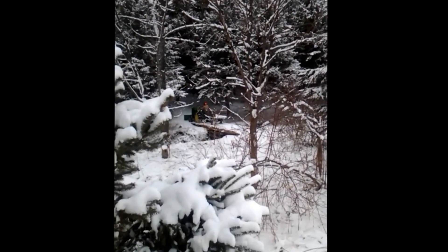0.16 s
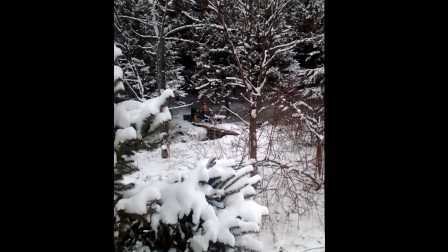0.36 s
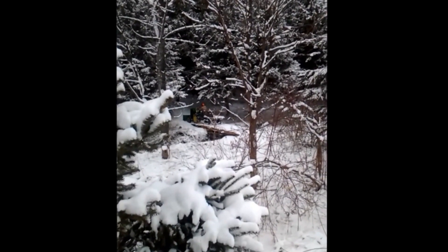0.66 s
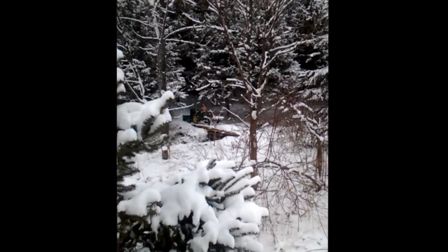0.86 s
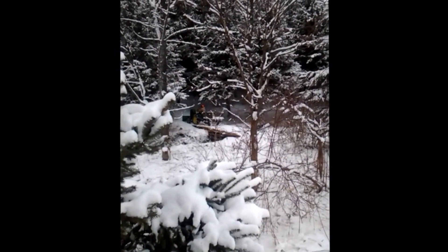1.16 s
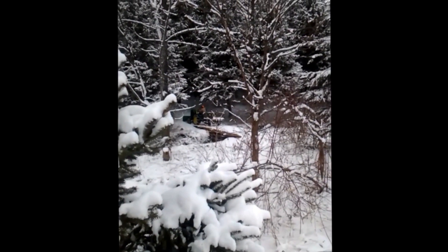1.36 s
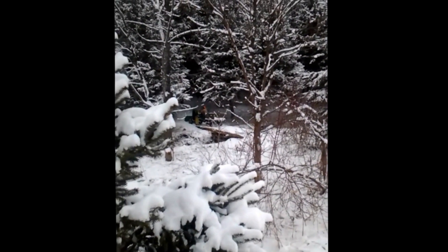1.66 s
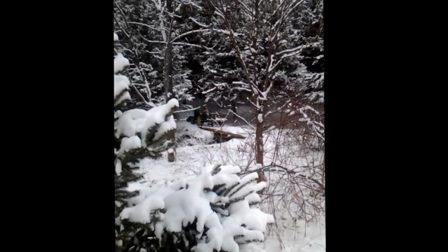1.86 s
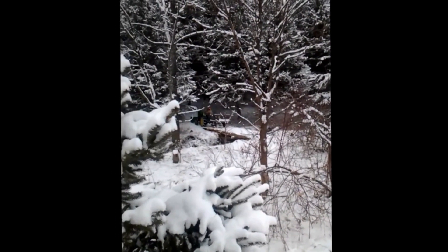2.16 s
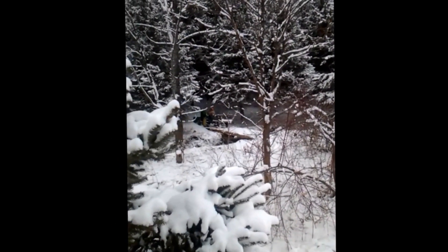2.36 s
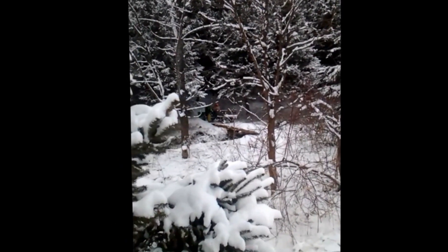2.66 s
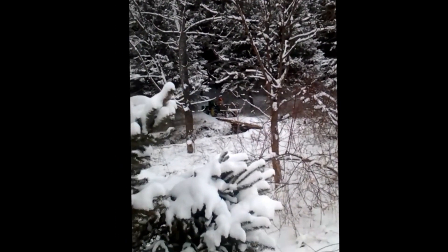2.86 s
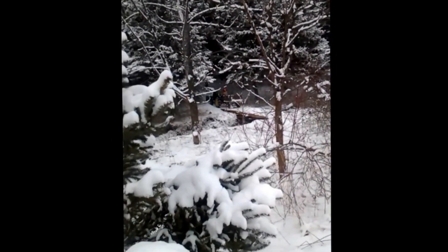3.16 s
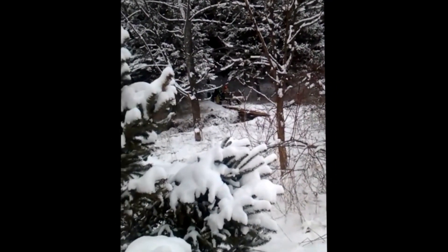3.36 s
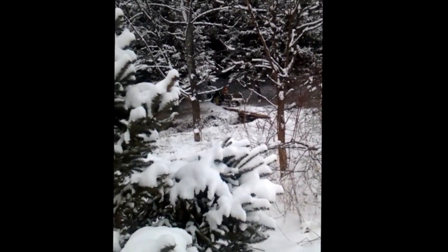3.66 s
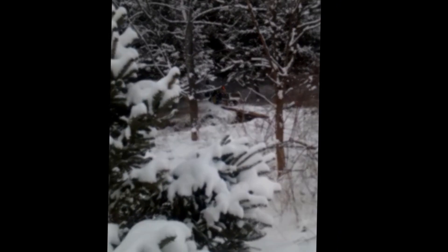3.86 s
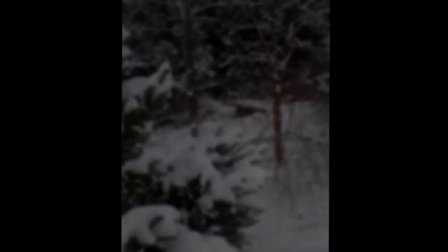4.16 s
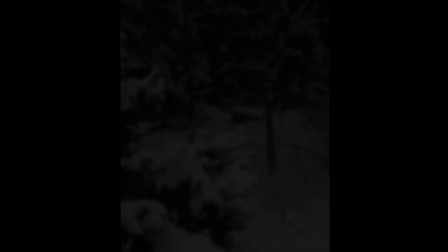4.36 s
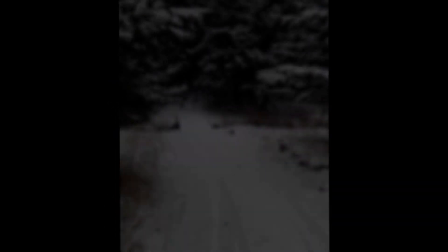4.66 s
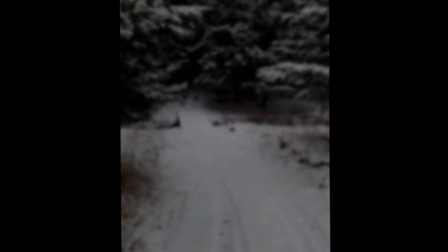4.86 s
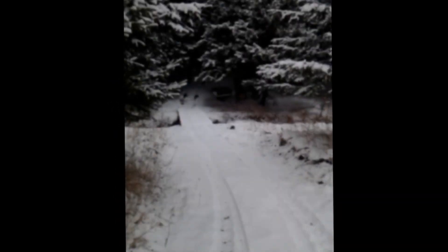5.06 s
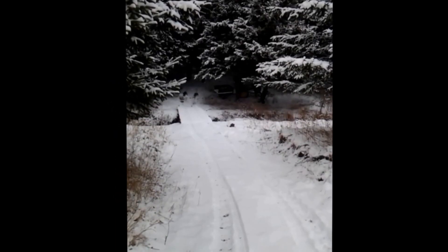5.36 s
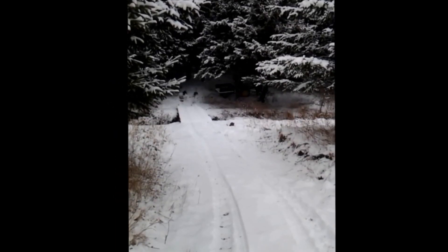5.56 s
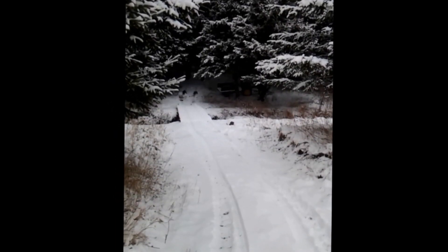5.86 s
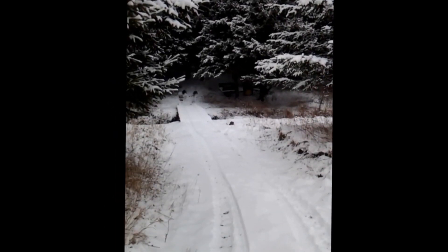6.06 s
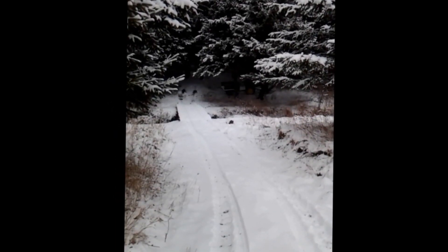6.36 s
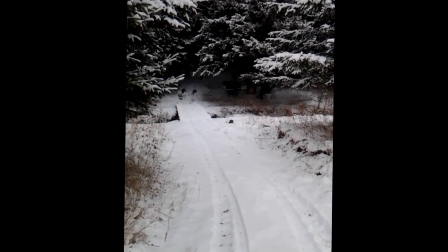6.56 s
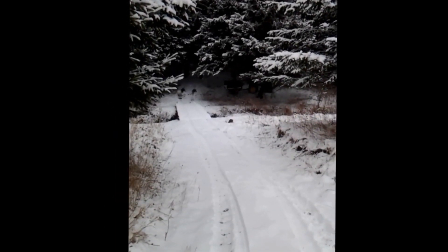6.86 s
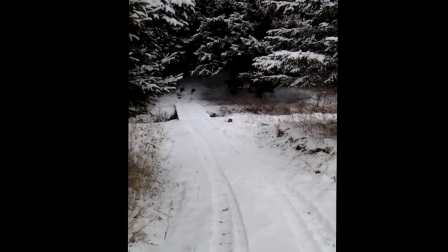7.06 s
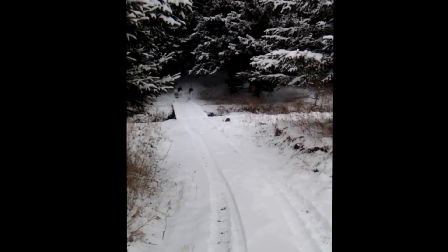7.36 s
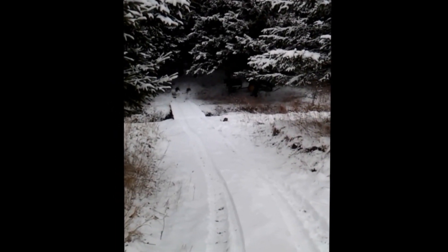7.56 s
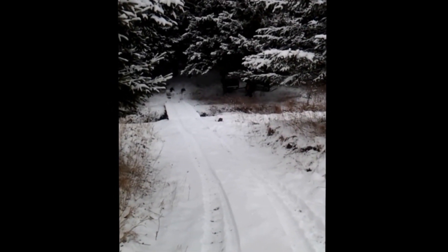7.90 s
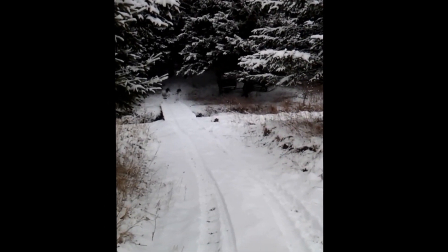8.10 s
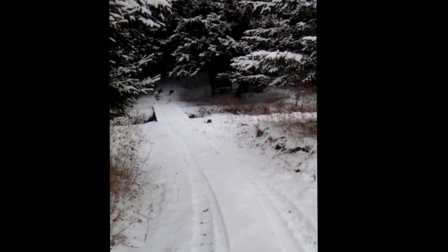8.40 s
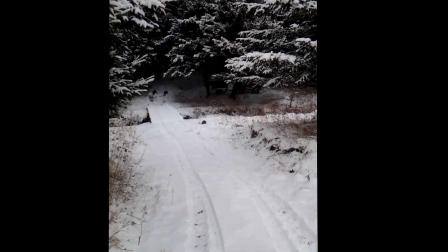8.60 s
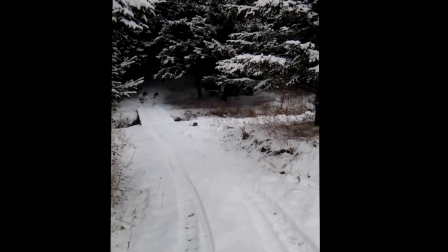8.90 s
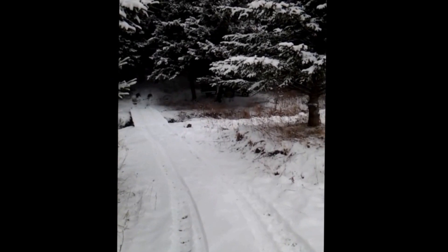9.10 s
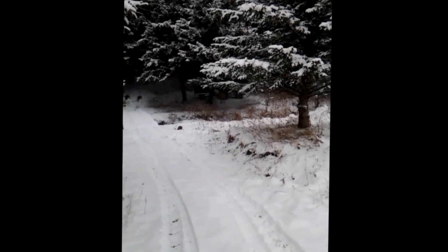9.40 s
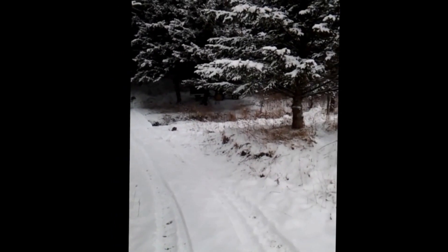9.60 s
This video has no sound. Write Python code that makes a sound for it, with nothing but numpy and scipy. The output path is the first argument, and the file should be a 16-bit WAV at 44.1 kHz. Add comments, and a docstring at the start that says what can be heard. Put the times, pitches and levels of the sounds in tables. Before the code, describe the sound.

An old two-cylinder diesel tractor idles at a distance in snowy woods, knocks hard as it throttles up, then runs on faster while fingers bump the microphone.

```python
"""An old two-cylinder diesel tractor idles some way off in a snowy wood; hard knocks mark the throttling up.
It pulls for a while, then runs on faster. Fingers rub and bump the right port of the hand-held microphone.
Two exhaust puffs per cycle ring pipe and silencer, and noise echoes from the trees; injector and valve
blows are shaped noise that follows effort and throttle; knocks and bumps also ring decaying sines.
"""
import sys
import numpy as np
from scipy import signal
from scipy.fft import rfft, irfft
from scipy.io import wavfile
from scipy.ndimage import uniform_filter1d, map_coordinates

SR = 44100
rng = np.random.default_rng(int(sys.argv[2]) if len(sys.argv) > 2 else 0)


def write(x):
    x = np.atleast_2d(x).T
    wavfile.write(sys.argv[1], SR, np.round(np.clip(x, -1, 1) * 32767).astype(np.int16))


N = 429534
TIME = np.arange(N) / SR

# Levels are relative within each part unless noted; spectra are normalised to unit power.

# crankshaft [t/s, four-stroke cycles completed]
CRANK = [(-0.042, 0), (0.344, 3), (0.714, 6), (1.103, 9), (1.642, 13), (2.292, 18), (2.558, 20), (2.67, 21),
         (2.87, 23), (3.483, 30), (4.477, 41), (5.319, 50), (5.591, 53), (7.058, 69), (7.798, 77),
         (8.532, 85), (9.087, 91), (9.822, 99)]
# throttle (0-1) from cycle rate; the flywheel follows later
IDLE_THROTTLE, IDLE_CYCLES_PER_S, THROTTLE_PER_CYCLE_RATE, FLYWHEEL_LAG_S = 0.3, 8.08, 0.26, 0.31
# engine effort, heard as mechanical noise; eases abruptly as the pull ends [t/s, level/dB]
EFFORT = [(0.0, -43), (0.44, -43.5), (0.96, -45), (1.89, -43.5), (2.05, -45), (2.52, -37.5), (2.7, -33),
          (2.87, -31), (3.37, -34.5), (3.76, -31.5), (5.14, -31.5), (5.29, -31.5), (5.39, -35),
          (6.19, -36.5), (6.64, -39), (7.5, -36), (8.47, -37.5), (9.74, -36)]
# exhaust roar, by how hard the engine pulls [t/s, level/dB]
LOAD = [(0.0, -50), (0.75, -48.5), (1.28, -48.5), (2.47, -48.5), (2.77, -39), (2.89, -34), (3.23, -40.5),
        (3.51, -41.5), (3.84, -36.5), (3.88, -34), (4.54, -31), (5.29, -32.5), (5.39, -33), (6.47, -35),
        (8.72, -35), (8.99, -34), (9.74, -33.5)]
# a blip of fuel swells the roar just before the run-up
BLIP_S, BLIP_WIDTH_S, BLIP_DB = 2.16, 0.065, 7.5
# part laws [level/dB at mean effort and full throttle, slope/dB per dB effort, level/dB added at shut throttle]
THUD_LAW = (-51, 0.017, -14.5)
RATTLE_LAW = (-40.5, 1, -2.1)
BRIGHT_LAW = (-43.5, 1.52, 9)
PING_LAW = (-52, 2.46, 2)
RUSH_LAW = (-44, 1.26, 8.6)

# microphone aim as the hand turns it [t/s, roar L-R/dB, bright clatter L-R/dB]
AIM = [(0, 0, -4.5), (3.3, 2, -5.5), (4.2, -0.5, -8), (5.28, -0.5, -5), (5.45, -2.2, -11.5),
       (9.74, -1, -12)]
# left port hears the engine later [t/s, lag/samples]
PORT_LAG = [(0, 6.3), (2.4, 6.02), (4.6, 8.04), (9.74, 8)]
# port resonances [f/Hz, width/Hz, lift/dB]
LEFT_PORT = [(2326, 310, 14.5), (6400, 800, 0.5), (7600, 390, 4), (8200, 1600, 5)]
RIGHT_PORT = [(10100, 1700, -2)]
# right port ring, lower once the grip has shifted
RIGHT_RING_HZ, RIGHT_RING_LATE_HZ, RIGHT_RING_WIDTH_HZ, RIGHT_RING_DB = 6990, 6760, 286, 7.5
GRIP_SHIFT_S, GRIP_SHIFT_LENGTH_S = 5.3, .15
CUTOFF_HZ = 14900

# rush of air and gears [f/Hz, level/dB per Hz]
FAN_SPECTRUM = [(20, -20), (60, -5), (150, 7), (235, 3), (310, 8), (400, 6.5), (1000, 2.5), (2500, -6.5),
                (4000, -2), (6000, -7), (9000, -6), (11000, -11), (14500, -28)]
FAN_WAVER_DB, FAN_WAVER_HZ, FAN_WAVER_TOP_HZ = 3, 5, 400  # depth before normalising, rate, upper edge
FAN_LOW_DB_PER_DB = -.55

# finger bumps, and low thumps that come with the knocks at 2.552 and 2.668 s; a firmer touch rings higher [t/s,
# peak level/dB, case ring f/Hz]
BUMPS = [(0.149, -27.5, 278), (0.176, -31, 280), (0.236, -29, 260), (0.286, -26.5, 210), (0.315, -38, 290),
         (0.412, -28.5, 166), (0.424, -40, 219), (0.433, -25, 260), (0.881, -42, 260), (1.87, -38, 149),
         (2.209, -40, 120), (2.365, -36, 135), (2.498, -26.5, 260), (2.552, -30, 189), (2.668, -33, 200),
         (2.76, -21, 300), (2.947, -26, 300), (3.468, -7, 380), (3.483, -8.5, 328), (3.504, -8.5, 280),
         (3.511, -9.5, 240), (3.551, -12, 240), (3.586, -12, 302), (3.594, -5, 316), (3.629, -12, 290),
         (3.64, -10.5, 345), (3.679, -14, 300), (3.685, -7, 384), (3.737, -7.5, 403), (3.782, -14, 418),
         (3.811, -18, 220), (3.829, -16, 220), (3.968, -23, 260), (4.033, -14.5, 260), (4.293, -14, 300),
         (4.338, -10, 280), (4.376, -7, 320), (4.774, -14.5, 359.5), (4.872, -14, 275), (5.173, -16, 300.3),
         (5.212, -9.5, 387), (5.292, -12.5, 364.7), (5.526, -21.5, 217), (5.543, -18, 298.5),
         (5.660, -15.5, 271), (5.686, -16, 223.5), (5.811, -25, 259.8), (6.064, -22, 260)]
# sliding fingers [start/s, end/s, level/dB]
RUBS = [(0.07, 0.298, -50), (.4, 0.44, -53), (0.947, 1.348, -63.5), (2.477, 3.4, -49), (3.444, 3.784, -32),
        (3.964, 4.064, -31), (4.117, 4.203, -37), (4.264, 4.44, -32), (4.584, 4.673, -42),
        (4.757, 4.78, -40), (4.828, 5.015, -32.5), (5.082, 5.193, -35), (5.202, 5.295, -33),
        (5.508, 6.11, -47.5)]
# skin on the case [f/Hz, level/dB per Hz]
FINGER_SPECTRUM = [(40, -54), (90, -10.5), (170, 0), (330, -3), (480, -5), (700, -12), (1200, -27.5),
                   (3000, -37)]
RUB_ATTACK_S, RUB_RELEASE_DB_PER_S = 0.0092, 106
CATCHES_PER_S, CATCH_DB, CATCH_SPREAD_DB = 22, 1.5, 2.5  # mean rate; level re rub
CASE_HZ, CASE_T60_S, CASE_DB = 348, 0.013, -13.5
BUMP_RISE_S = .002  # soft skin presses gradually
# a light touch booms; a firm one damps the bass and scrapes higher up
TOUCH_BASS_HZ, TOUCH_BASS_DB, FIRM_RUB_DB = 197, 11.5, -40
SCRAPE_HZ, SCRAPE_DB = 433, -5.5

# knocks, light at idle, hardest at the throttling up [t/s, crack level/dB, clank level/dB, clank centre f/Hz]
KNOCKS = [(0.084, -22, -48, 1900), (0.212, -23.5, -35, 2100), (0.34, -21.5, -34, 1750),
          (0.466, -22.5, -42, 2000), (0.588, -30, -36, 2200), (0.711, -27, -41, 1900),
          (0.747, -29, -33, 1850), (0.969, -29, -43, 2000), (1.235, -27, -43, 1800),
          (1.371, -20.5, -42, 1800), (1.404, -28, -40, 2100), (1.504, -21.5, -36.5, 1750),
          (1.638, -25, -34.5, 1800), (1.769, -25.5, -34, 1900), (1.802, -25, -39, 2200),
          (1.902, -20, -31, 1700), (1.932, -24, -42, 1900), (2.030, -21, -33, 2000),
          (2.061, -28, -42, 2200), (2.1094, -24, -30, 2110), (2.159, -19.5, -32, 2100),
          (2.190, -30, -31.5, 2200), (2.4578, -18.5, -21.5, 1980), (2.554, -15, -18, 1750),
          (2.583, -19, -21, 1700), (2.668, -18, -17.5, 1540), (2.6955, -17.5, -14.5, 1900),
          (2.770, -16.5, -16, 1850), (2.7958, -11.5, -17, 2050), (2.8669, -9, -12, 1770),
          (2.889, -7.5, -14.5, 1880), (2.952, -12.5, -19, 1650), (3.064, -15, -25, 2100),
          (3.151, -18, -46, 2000), (3.216, -19, -44, 2000), (3.572, -20, -27.5, 1700),
          (3.595, -20, -28, 1900), (3.615, -17.5, -39, 2000), (3.661, -15, -32, 1900),
          (4.112, -17.5, -37, 2000), (4.385, -18, -40, 2000), (4.48, -21, -23, 1900),
          (4.57, -17, -32, 2000), (4.662, -16.5, -36, 2000)]
# block modes rung by a knock [f/Hz, level/dB, t60/s]
CLANK_MODES = [(1380, 9, 0.03), (1555, -1, 0.046), (1675, 10, 0.029), (1760, 1, 0.041), (1870, -0.5, 0.023),
               (2060, -2, 0.038), (2243, -2, 0.051), (2430, -1, 0.04)]
# frame shaken by a knock [f/Hz, level/dB per Hz]
FRAME_SPECTRUM = [(200, -13), (330, -1), (480, 3.5), (680, -2.5), (900, -9.5), (1250, -7.5), (1500, -22)]
KNOCK_LEAD_S, FRAME_DB = .002, -12
CLANK_DB, CLANK_SPREAD_DB, CLANK_DELAY_S, CLANK_OCTAVES = -10.5, 2.5, .005, .2
# tink of each crack; level re crack
CRACK_RING_HZ, CRACK_RING_SPREAD_HZ, CRACK_RING_T60_S, CRACK_RING_DB = 7200, 280, .028, -10.5

# metallic ticks and knock edges [f/Hz, level/dB per Hz]
PING_SPECTRUM = [(1500, -12), (4000, -36), (7500, 17), (10000, 11.5), (12500, 2.5), (15000, -14)]
# injector and valve blows [place in cycle/0-1, level/dB at shut throttle, level/dB at full throttle]
BLOWS = [(0.93, 7, 8), (0.2, 12.5, 6.5), (0.48, 11.5, 6.5), (0.14, 2, 4), (0.77, -6, 3.5)]
# casing rattle and clank [f/Hz, level/dB per Hz]
CASING_SPECTRUM = [(300, 1.5), (600, 2), (900, -11.5), (1150, -8.5), (1420, -1), (1600, 6), (1780, -1.5),
                   (1950, 2.5), (2400, -9), (2800, -5.5), (4000, -7.5), (6000, -21)]
# bright clatter and knock cracks [f/Hz, level/dB per Hz]
CLATTER_SPECTRUM = [(2000, 0), (3200, -12.5), (4000, -8.5), (4700, -7.5), (6000, 2.5), (7200, 5.5),
                    (8500, -4), (10000, -4), (12000, -58), (14500, -47)]
# engine block and sheet metal resonances [f/Hz, width/Hz, lift/dB]
BLOCK = [(1050, 120, 2), (1475, 68, -3), (1870, 33, 5), (2234, 14, 8), (3010, 110, 3.5), (3740, 150, 4.5),
         (4080, 180, 1), (4900, 110, 4), (7540, 180, 2.5)]
RATTLE_LEAN_DB = -3.5

# exhaust firings [place in cycle/0-1, level/dB]
FIRINGS = [(.92, 6), (.16, 2.5)]
# exhaust pipe modes [f/Hz, level/dB, t60/s]
PIPE_MODES = [(97.8, 9.5, 0.14), (124, 3, 0.085)]
# silencer shell modes [f/Hz, level/dB, t60/s]
SHELL_MODES = [(300, -15, 0.14), (421, 5.5, 0.36), (458.7, -1, 0.34), (531, 1, 0.38), (572, -5.5, 0.23),
               (631, -4.5, 0.28), (674, -17, 0.082), (785, -14, 0.15), (825, -22, 0.08), (1069, -9, 0.067)]
# exhaust echo and gas noise [f/Hz, level/dB per Hz]
ROAR_SPECTRUM = [(130, -12), (200, -27), (280, -16), (360, -13.5), (420, -10), (480, -3), (540, -4.5),
                 (620, -3.5), (720, -6), (850, -9.5), (960, -14), (1150, -12.5), (1400, -28.5), (2200, -20)]
# hoarse band, mostly climbing as the engine pulls [t/s, centre f/Hz]
RASP = [(0, 481.2), (3.3, 448), (3.9, 660), (4.5, 739), (5.4, 731.3), (6.9, 704.7), (7.5, 1086),
        (9.74, 1132)]
RASP_DB, RASP_DB_PER_OCTAVE, RASP_HALF_WIDTH_HZ = -9, -2.5, 134
# throaty exhaust resonance, wandering and swelling [t/s, centre f/Hz, level/dB]
THROAT = [(0, 501, -4), (2.05, 500, -8), (2.15, 469, -2), (2.25, 517, -8), (3.3, 494.4, -8),
          (3.84, 560, -1), (3.875, 582, 5), (3.95, 639, -5), (4.35, 604.4, -17), (4.52, 560, 0.5),
          (4.61, 604.5, 2.5), (4.68, 596, -4), (5.06, 600.4, -7), (5.14, 603, 4), (5.25, 560, -6),
          (5.75, 610, -2.5), (6.3, 562.3, -3.5), (6.62, 502, -4.5), (7.0, 613, -3), (7.5, 601, -3.5),
          (7.8, 604, -6.5), (8.0, 600.3, -4), (8.3, 602, -9), (8.6, 548.3, -10), (9.0, 590.5, -7),
          (9.3, 488.7, -7), (9.74, 589.4, -10)]
THROAT_HALF_WIDTH_HZ = 48
# notes as exhaust and intake valves open [place in cycle/0-1, f/Hz, t60/s, level/dB]
BARKS = [(.955, 286, .055, 2), (.27, 215, .06, -9), (.66, 422, .07, -5), (.96, 415, .04, -5)]
BARK_DB, BARK_SPREAD_DB, BARK_SWELL_S = -14.5, 1.2, .0025


def from_db(db):
    """Decibels to gain."""
    return 10 ** (np.asarray(db) / 20)


def rms_one(x):
    """Scale to rms 1."""
    return x / np.sqrt(np.mean(x ** 2) + 1e-20)


def in_time(rows):
    """Interpolate each column of a curve at every sample."""
    s, *columns = np.transpose(rows)
    return [np.interp(TIME, s, c) for c in columns]


def colour(x, spectrum):
    """Shape x by a spectrum with closed ends; white noise keeps its power."""
    hz, level_db = np.transpose(spectrum)
    log_bins = np.log(np.arange(1, 2 ** 18 + 2) * SR / 2 ** 19)
    level_db = np.interp(log_bins, np.log(hz), level_db, left=-80, right=-80)
    gain = rms_one(from_db(level_db))
    return irfft(rfft(x, 2 ** 19) * gain)[..., :N]


def stereo_noise(alike, size=N):
    """White noise; alike (0-1) is the power share common to both channels."""
    alike = np.clip(alike, 0, 1)
    common = np.sqrt(alike) * rng.standard_normal(size)
    return common + np.sqrt(1 - alike) * rng.standard_normal((2, size))


def pan(x, lean_db):
    """Lean to the left by lean_db."""
    return x * from_db(np.array([[1], [-1]]) * lean_db / 2)


def clicks(times, sizes):
    """One click of a given size at each time."""
    at = np.round(np.asarray(times) * SR).astype(int)
    inside = (at >= 0) & (at < N)
    sizes = sizes * np.ones(len(at))
    return np.bincount(at[inside], sizes[inside], N)


def each_cycle(place, spread_db, jitter_s):
    """Click as the crankshaft passes a place in its cycle, with random size and timing."""
    s, turns = np.transpose(CRANK)
    chance = rng.standard_normal((int(turns[-1]), 2))
    times = np.interp(np.arange(len(chance)) + place, turns, s)
    return clicks(times + jitter_s * chance[:, 0], from_db(spread_db * chance[:, 1]))


def burst(hits, rise_s, width_s, tail_db, tail_s):
    """Envelope of blows: a swell to a pointed peak plus a scattered tail, summed in power."""
    t = TIME[:SR // 2]
    direct = np.exp(-np.abs(t - rise_s) / width_s)
    tail = from_db(tail_db) * (1 - np.exp(-t / rise_s)) * np.exp(-t / tail_s)
    power = signal.fftconvolve(hits ** 2, direct ** 2 + tail ** 2)[:N]
    return np.sqrt(np.abs(power))


def ring(x, hz, t60_s):
    """Two-pole resonator: a unit click starts a decaying sine of height 1."""
    r, w = from_db(-60 / (t60_s * SR)), 2 * np.pi * hz / SR
    return signal.lfilter([0, np.sin(w)], [1, -2 * r * np.cos(w), r * r], x + 1e-18)


def modes(x, table):
    """Parallel modes with alternating signs; rms 1."""
    total = 0
    for k, (hz, db, t60_s) in enumerate(table):
        total = total + (-1) ** k * from_db(db) * ring(x, hz, t60_s)
    return rms_one(total)


def short_rings(rows, rise_s, t60_s):
    """Each (t/s, peak/dB, f/Hz) row swells to its peak, then decays as a sine."""
    out = np.zeros(N + SR)
    t = TIME[:SR // 8] - TIME[SR // 50]
    shape = np.where(t < 0, np.exp(-np.abs(t) / rise_s), from_db(-60 * np.abs(t) / t60_s))
    for s, db, hz in rows:
        start = int((s + t[0]) * SR)
        out[start:start + len(t)] += from_db(db) * shape * np.sin(2 * np.pi * hz * t)
    return out[:N]


def resonate(x, resonances):
    """A cavity or panel boosts or cuts narrow bands in series."""
    for hz, width_hz, lift_db in resonances:
        band = signal.lfilter(*signal.iirpeak(hz, hz / width_hz, fs=SR), x)
        x = x + (from_db(lift_db) - 1) * band
    return x


def gliding_band(hz, half_width_hz):
    """Turbulence of even strength in a resonance whose centre moves; rms 1."""
    smooth = signal.butter(2, half_width_hz, fs=SR, output="sos")
    swirl = signal.sosfilt(smooth, stereo_noise(alike=0.95) + 1j * stereo_noise(alike=0.92))
    power = np.mean(np.abs(swirl) ** 2, axis=0)
    strength = np.sqrt(uniform_filter1d(power, size=SR // 20) + 1e-12)
    carrier = np.exp(2j * np.pi * np.cumsum(hz) / SR)
    return rms_one(np.real(swirl / strength * carrier))


def throttle_opening():
    """Throttle 0-1 from the speed the crankshaft is about to reach."""
    s, turns = np.transpose(CRANK)
    rate = np.interp(TIME + FLYWHEEL_LAG_S, (s[1:] + s[:-1]) / 2, np.diff(turns) / np.diff(s))
    return np.clip(IDLE_THROTTLE + THROTTLE_PER_CYCLE_RATE * (rate - IDLE_CYCLES_PER_S), 0, 1)


def follow(law, throttle):
    """Level in dB of a part that follows effort and throttle."""
    base_db, slope, shut_db = law
    effort_db, = in_time(EFFORT)
    return base_db + slope * (effort_db - effort_db.mean()) + shut_db * (1 - throttle)


def fan(rush_db):
    """Broadband rush of moving air and gears; its low end wavers and grows less than the rest."""
    rush = colour(stereo_noise(alike=0.57), FAN_SPECTRUM)
    low = signal.sosfilt(signal.butter(1, FAN_WAVER_TOP_HZ, fs=SR, output="sos"), rush)
    slow = signal.butter(2, FAN_WAVER_HZ, fs=SR, output="sos")
    waver = rms_one(signal.sosfilt(slow, rng.standard_normal(N)))
    low_gain = rms_one(from_db(FAN_WAVER_DB * waver))
    low_gain = low_gain * from_db(FAN_LOW_DB_PER_DB * (rush_db - rush_db.min()))
    return from_db(rush_db) * (rush + (low_gain - 1) * low)


def rubbing():
    """Sliding strength: each rub sets in quickly, holds and dies away."""
    total = 0
    for start, end, db in RUBS:
        attack = np.clip((TIME - start) / RUB_ATTACK_S, 0, 1)
        total = total + attack * from_db(db - RUB_RELEASE_DB_PER_S * np.clip(TIME - end, 0, 1))
    return total


def bumps():
    """Soft skin swells, then rings the case for a few cycles at a pitch set by the touch."""
    return short_rings(BUMPS, BUMP_RISE_S, CASE_T60_S)


def fingers():
    """Dull case bumps and a lumpy rub with small catches, almost all in the right port."""
    s, bump_db, _ = np.transpose(BUMPS)
    rub = rubbing()
    caught = rng.random(N) < CATCHES_PER_S / SR
    catches = caught * rub * from_db(CATCH_DB + CATCH_SPREAD_DB * rng.standard_normal(N))
    taps = clicks(s + 0.0017, from_db(bump_db)) + catches
    case = bumps() + ring(catches, CASE_HZ, CASE_T60_S)
    scuff = from_db(-14) * burst(taps, rise_s=.002, width_s=.003, tail_db=-7, tail_s=.018)
    unevenness = rms_one(uniform_filter1d(rng.standard_normal(N), size=400))
    lumps = rms_one(from_db(2.5 * unevenness))
    friction = (scuff + from_db(5.0) * rub * lumps) * stereo_noise(alike=0.22)
    touch = colour(from_db(CASE_DB) * case + friction, FINGER_SPECTRUM)
    firm = from_db(FIRM_RUB_DB)
    bass = signal.lfilter(*signal.butter(1, TOUCH_BASS_HZ, fs=SR), touch)
    bass_gain = from_db(TOUCH_BASS_DB) / (1 + rub / firm)
    scrape = signal.lfilter(*signal.butter(1, SCRAPE_HZ, "high", fs=SR), touch) * rub / (rub + firm)
    case_sound = touch + (bass_gain - 1) * bass + from_db(SCRAPE_DB) * scrape
    return case_sound * from_db([[-23], [-1.5]])


def pinging(ping_db):
    """Very short metallic ticks at three places per cycle, growing steeply with effort."""
    ticks = 0
    for place, db in [(0.94, 4.5), (0.23, 0.5), (0.68, -3.0)]:
        ticks = ticks + from_db(db) * each_cycle(place, spread_db=2.5, jitter_s=0.0017)
    snap = rms_one(burst(ticks, rise_s=0.0062, width_s=0.0017, tail_db=-5.0, tail_s=0.025))
    return from_db(ping_db) * colour(snap * stereo_noise(alike=0.026), PING_SPECTRUM)


def block_ring():
    """Each knock strikes the block modes, most those near its pitch; a bandpass limits bass and treble."""
    s, _, body_db, centre_hz = np.transpose(KNOCKS)
    chance_db = CLANK_SPREAD_DB * rng.standard_normal((len(s), len(CLANK_MODES)))
    times = s - KNOCK_LEAD_S + CLANK_DELAY_S
    rings = 0
    for k, (hz, db, t60_s) in enumerate(CLANK_MODES):
        near = np.exp(-.5 * (np.log2(hz / centre_hz) / CLANK_OCTAVES) ** 2)
        strikes = clicks(times, near * from_db(body_db + CLANK_DB + db + chance_db[:, k]))
        rings = rings + (-1) ** k * ring(strikes, hz, t60_s)
    return signal.sosfilt(signal.butter(2, [1000, 3000], "band", fs=SR, output="sos"), rings)


def crack_ring():
    """Each crack rings a bright tink at a pitch of its own."""
    rows = []
    for s, db, _, _ in KNOCKS:
        hz = CRACK_RING_HZ + CRACK_RING_SPREAD_HZ * rng.standard_normal()
        rows.append((s + CLANK_DELAY_S / 2, db + CRACK_RING_DB, hz))
    return short_rings(rows, rise_s=.001, t60_s=CRACK_RING_T60_S)


def knocks(throttle):
    """Charges igniting all at once crack, clank the block and shake the frame; open throttle adds edge."""
    s, crack_db, body_db, _ = np.transpose(KNOCKS)
    cracks = clicks(s - KNOCK_LEAD_S, from_db(crack_db))
    clanks = clicks(s - KNOCK_LEAD_S, from_db(body_db))
    crack = from_db(-11.5) * burst(cracks, rise_s=0.0045, width_s=0.0028, tail_db=-7, tail_s=0.015)
    body = from_db(-2.3) * burst(clanks, rise_s=0.0058, width_s=0.0035, tail_db=-11.5, tail_s=0.03)
    shudder = from_db(FRAME_DB) * burst(clanks, rise_s=0.0089, width_s=0.0021, tail_db=-3.5, tail_s=0.092)
    edge = from_db(-2.5) * colour(throttle * crack * stereo_noise(alike=0.1), PING_SPECTRUM)
    casing = colour(body * stereo_noise(alike=0.88), CASING_SPECTRUM)
    frame = colour(shudder * stereo_noise(alike=0.94), FRAME_SPECTRUM)
    clank = pan(casing + block_ring() + frame, lean_db=-2.5)
    return colour(crack * stereo_noise(alike=1.0), CLATTER_SPECTRUM) + crack_ring() + edge + clank


def clatter(throttle, rattle_db, bright_db, rattle_lean_db, bright_lean_db):
    """Injector and valve blows shake the casing and spit a gritty treble."""
    blows = 0
    for place, idle_db, fast_db in BLOWS:
        gain = from_db(idle_db + throttle * (fast_db - idle_db))
        blows = blows + gain * each_cycle(place, spread_db=1.3, jitter_s=0.0007)
    roughness = rms_one(uniform_filter1d(rng.standard_normal(N), size=40))
    grit = rms_one(from_db(2.3 * roughness))
    shake = rms_one(burst(blows, rise_s=0.0055, width_s=0.01, tail_db=-0.5, tail_s=0.043))
    spit = rms_one(burst(blows, rise_s=0.0059, width_s=0.0074, tail_db=-1, tail_s=0.021))
    rattle = from_db(rattle_db) * colour(stereo_noise(alike=0.93) * shake, CASING_SPECTRUM)
    bright = from_db(bright_db) * colour(stereo_noise(alike=0.25) * grit * spit, CLATTER_SPECTRUM)
    return pan(rattle, rattle_lean_db) + pan(bright, bright_lean_db)


def rasp():
    """Hoarse gliding noise band that fades as it climbs."""
    hz, = in_time(RASP)
    level_db = RASP_DB + RASP_DB_PER_OCTAVE * np.log2(hz / hz[0])
    return from_db(level_db) * gliding_band(hz, RASP_HALF_WIDTH_HZ)


def barks():
    """Each valve opening lets out a short hollow note, nearly alike every cycle; rms 1."""
    out, t = 0, TIME[:SR // 5]
    for place, hz, t60_s, db in BARKS:
        envelope = (1 - np.exp(-t / BARK_SWELL_S)) ** 2 * from_db(db - 60 * t / t60_s)
        note = envelope * np.sin(2 * np.pi * hz * t)
        openings = each_cycle(place, spread_db=BARK_SPREAD_DB, jitter_s=.0004)
        out = out + signal.fftconvolve(openings, note)[:N]
    return rms_one(out)


def exhaust(throttle, thud_db, roar_db, lean_db):
    """Puffs ring pipe and silencer, return alike from the trees each cycle and trail fresh turbulence."""
    puffs = 0
    for place, db in FIRINGS:
        puffs = puffs + from_db(db) * each_cycle(place, spread_db=.7, jitter_s=.0001)
    outlet = signal.butter(3, 72, "high", fs=SR, output="sos")  # narrow outlet: no deep bass
    thud = rms_one(signal.sosfilt(outlet, modes(puffs, PIPE_MODES)))
    trees = stereo_noise(alike=0.99, size=SR // 2) * np.exp(-TIME[:SR // 2] / 0.12)
    returned = signal.fftconvolve(puffs[None], trees, axes=1)[:, :N]
    echo = rms_one(colour(returned, ROAR_SPECTRUM))
    chuff = rms_one(burst(puffs, rise_s=0.0085, width_s=0.005, tail_db=-4, tail_s=0.17))
    gas = stereo_noise(alike=0.99) * chuff
    shell = modes(gas + from_db(-6.5) * rms_one(puffs), SHELL_MODES)
    shell = shell * from_db(-12.5 + 2.9 * throttle)  # sings out under load
    throat_hz, throat_db = in_time(THROAT)
    throat = from_db(throat_db) * gliding_band(throat_hz, THROAT_HALF_WIDTH_HZ)
    roar = from_db(-3.5) * echo + from_db(-4.0) * colour(gas, ROAR_SPECTRUM) + shell
    roar = roar + chuff * (throat + rasp()) + from_db(BARK_DB) * barks()
    return from_db(thud_db) * thud + pan(from_db(roar_db) * roar, lean_db)


def scene():
    """Tractor leaning mostly right, left port delayed; fingers at the microphone itself."""
    throttle = throttle_opening()
    load_db, = in_time(LOAD)
    roar_db = load_db + BLIP_DB * np.exp(-((TIME - BLIP_S) / BLIP_WIDTH_S) ** 2)
    roar_lean_db, bright_lean_db = in_time(AIM)
    rattle_db, bright_db = follow(RATTLE_LAW, throttle), follow(BRIGHT_LAW, throttle)
    metal = clatter(throttle, rattle_db, bright_db, RATTLE_LEAN_DB, bright_lean_db)
    metal = metal + pinging(follow(PING_LAW, throttle)) + knocks(throttle)
    puffing = exhaust(throttle, follow(THUD_LAW, throttle), roar_db, roar_lean_db)
    left, right = puffing + from_db(-1) * resonate(metal, BLOCK) + fan(follow(RUSH_LAW, throttle))
    lag_samples, = in_time(PORT_LAG)
    left = map_coordinates(left, [np.arange(N) - lag_samples], order=3)
    return np.array([left, right]) + fingers()


def record(dry):
    """Each port adds its colour; the right ring drops as the grip shifts; a low-pass cuts the top."""
    left, right = resonate(dry[0], LEFT_PORT), resonate(dry[1], RIGHT_PORT)
    before = resonate(right, [(RIGHT_RING_HZ, RIGHT_RING_WIDTH_HZ, RIGHT_RING_DB)])
    after = resonate(right, [(RIGHT_RING_LATE_HZ, RIGHT_RING_WIDTH_HZ, RIGHT_RING_DB)])
    shifted = np.clip((TIME - GRIP_SHIFT_S) / GRIP_SHIFT_LENGTH_S, 0, 1)
    heard = np.array([left, before + shifted * (after - before)])
    return signal.sosfilt(signal.ellip(10, .3, 80, CUTOFF_HZ, fs=SR, output="sos"), heard)


dry = scene()
out = record(dry)
write(out)
```